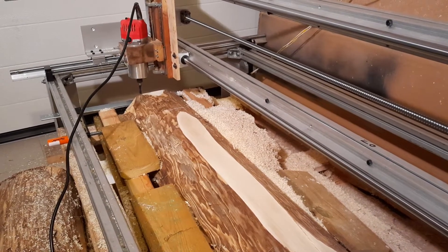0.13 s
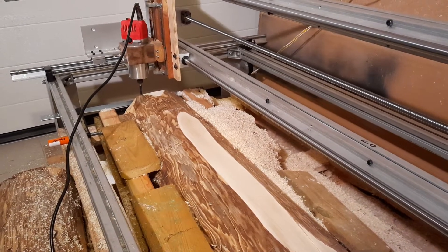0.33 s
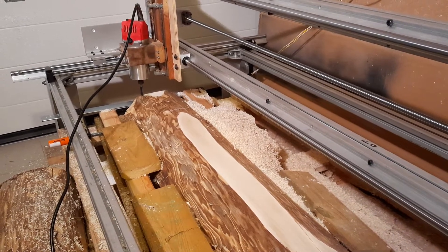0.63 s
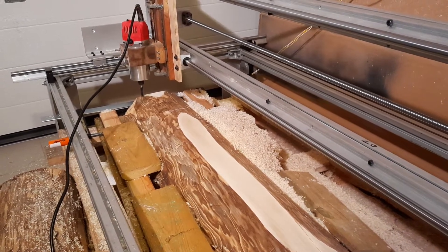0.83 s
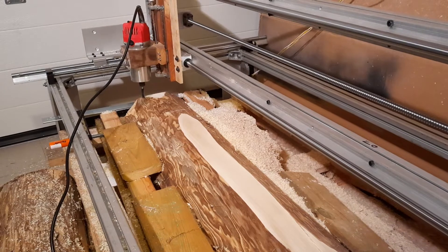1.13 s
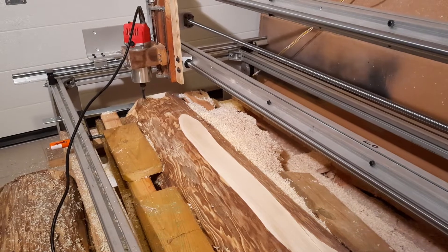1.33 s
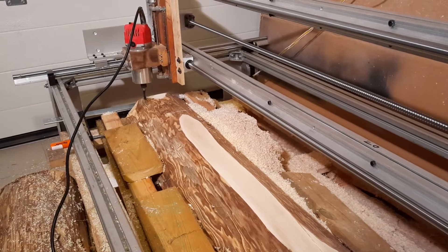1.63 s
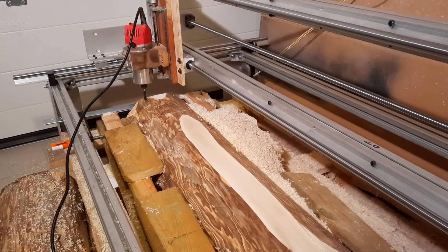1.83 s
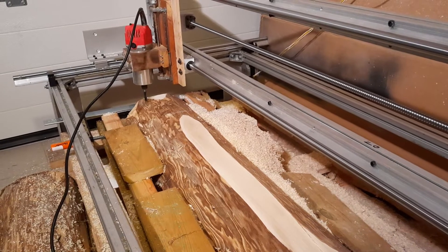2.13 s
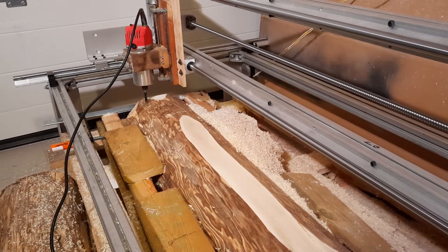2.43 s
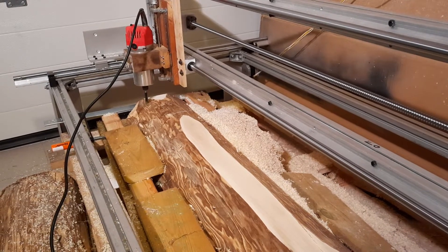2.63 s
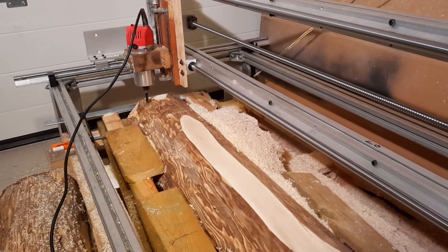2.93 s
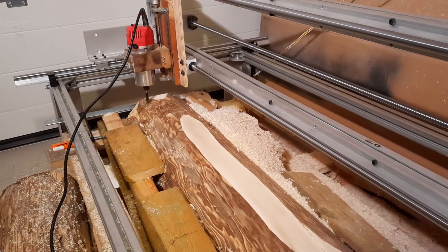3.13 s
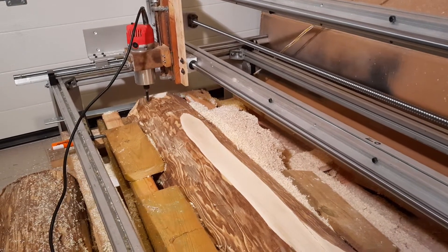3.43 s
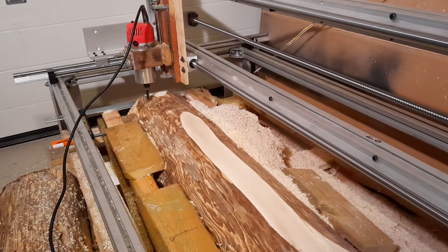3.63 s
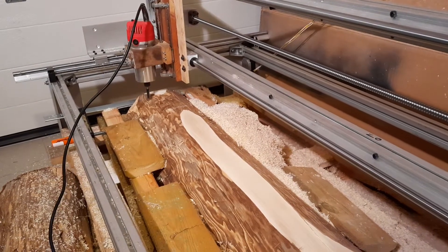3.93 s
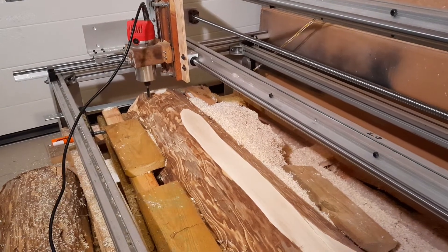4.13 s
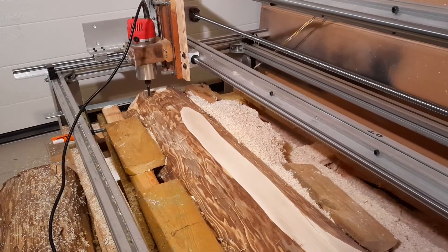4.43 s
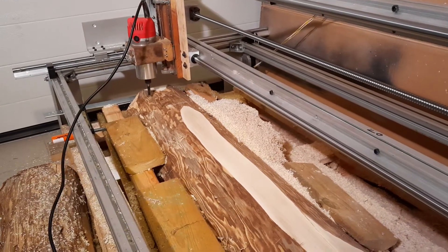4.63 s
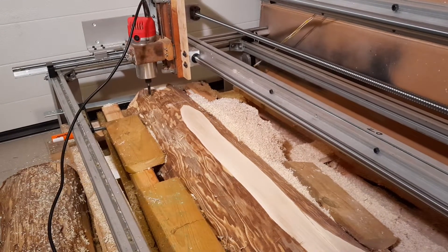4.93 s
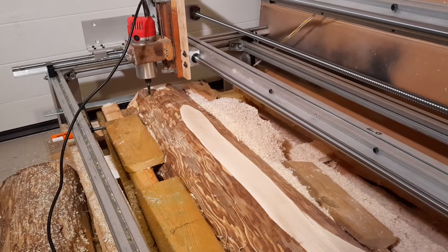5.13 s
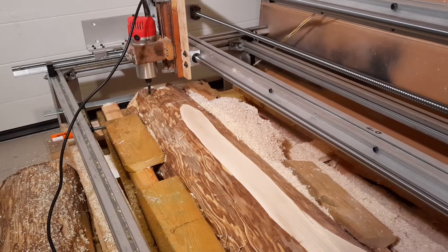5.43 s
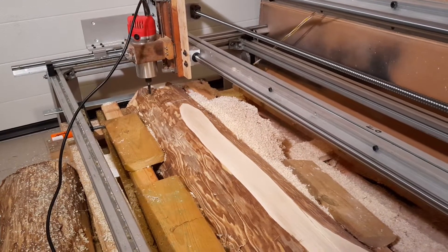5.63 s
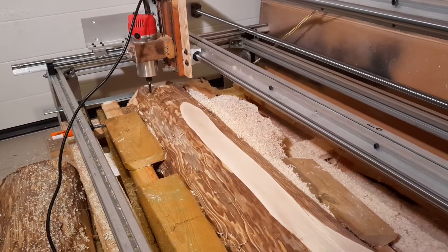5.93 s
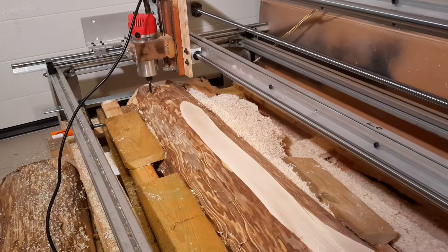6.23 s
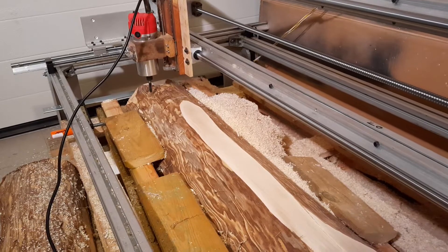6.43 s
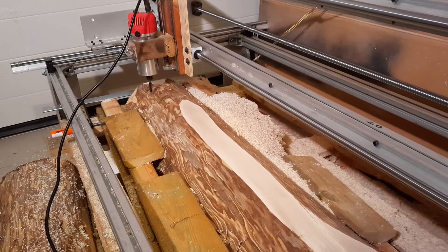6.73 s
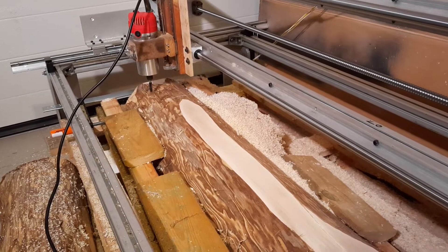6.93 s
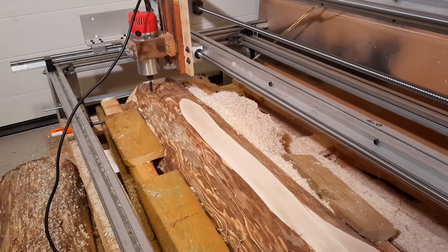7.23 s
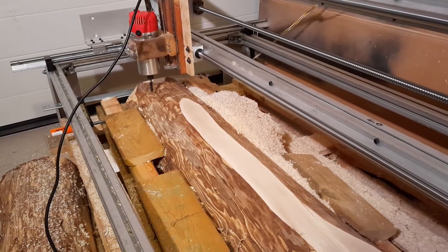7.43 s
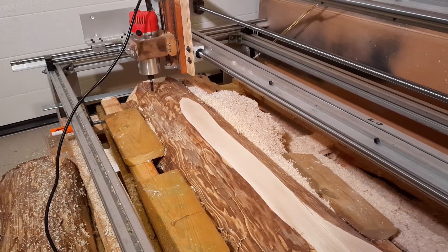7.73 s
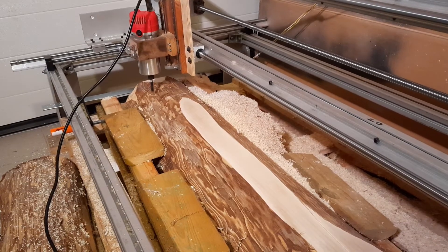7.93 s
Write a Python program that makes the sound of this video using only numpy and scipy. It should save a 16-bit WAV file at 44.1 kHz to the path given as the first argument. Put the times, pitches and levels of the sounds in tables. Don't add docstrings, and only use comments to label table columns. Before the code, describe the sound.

In a garage workshop, a router mills a log without pause. Its steady, nasal whine sits near 500 hertz, with higher overtones swelling and fading separately left and right. Rushing chips, high cooling-air hiss and a low bench rumble fill the background. Brief harder bites interrupt the smooth tone, strongest near the end. A phone at close range moves slowly, its left side duller.

```python
import sys
import numpy as np
from scipy import signal
from scipy.fft import rfft, irfft, next_fast_len
from scipy.io import wavfile

SR = 44100
rng = np.random.default_rng(int(sys.argv[2]) if len(sys.argv) > 2 else 0)


def amplitude_ratio(level_db):
    exponent = np.asarray(level_db, float) / 20
    return 10 ** exponent


def materialize(psi):
    bounded = np.clip(np.atleast_2d(psi).T, -1, 1)
    quanta = np.round(bounded * 32767).astype(np.int16)
    wavfile.write(sys.argv[1], SR, quanta)


N = 357210
T = np.arange(N) / SR
HOLD = 50


def in_time(rows):
    seconds, *columns = np.transpose(rows)
    return [np.interp(T, seconds, column) for column in columns]


def at_hz(points, hz):
    point_hz, db = np.transpose(points)
    return np.interp(np.log(hz), np.log(point_hz), db)


def drift(rate, count):
    pole = np.exp(-2 * np.pi * rate * HOLD / SR)
    warm_up = 3000
    white = rng.standard_normal((count, N // HOLD + 1 + warm_up, 2)) @ [1, 1j]
    slow = signal.lfilter([1], [1, -2 * pole, pole * pole], white)[:, warm_up:]
    spread = np.sqrt(np.mean(abs(slow) ** 2, axis=1, keepdims=True))
    return (slow / spread).astype(np.complex64)


def held(slow):
    return np.repeat(slow, HOLD, axis=1)[:, :N]


def swell(s, length, left_db, right_db):
    start = max(int((s - 0.8 * length) * SR), 0)
    near = slice(start, int((s + 0.8 * length) * SR))
    shape = np.exp(-(1.98 * (T[near] - s) / length) ** 4)
    return near, amplitude_ratio(np.array([[left_db], [right_db]])) * shape


# time in seconds, turns per second.
SPINDLE_SPEED = [(0, 499.5), (0.2, 499.4), (0.45, 498.3), (0.6, 498.8), (1.2, 502.3), (1.5, 502.7),
                 (2.3, 503.1), (2.6, 502.9), (3.5, 504.0), (4, 503.4), (4.8, 504.0), (6, 504.2),
                 (6.7, 505.1), (7.3, 504.6), (7.6, 504.2), (7.85, 503.2), (8.1, 502.9)]


def spindle_turn():
    return 2 * np.pi * np.cumsum(in_time(SPINDLE_SPEED)[0]) / SR


WHINE_PHASE = [1, 3.3, -0.3, -1.45, 3.7, 2.0]
# multiple, level in dB against the level in BITES, phase against
BITE_VOICE = [(1, -5, 3.95), (2, -30, 0.67), (3, 3, 1.64), (4, -34, 1.3), (5, -27, 1.2), (6, -21, 1.3)]
# time in seconds, shift in radians.
PATH_SHIFT = [(0.7, 0), (1.1, 0.6), (1.65, 1.25), (2.0, 1.7), (3.4, 2.05), (5.5, 2.15)]
# time in seconds, shift in radians.
FLUTE_FLIP = [(2.75, 0), (3.15, -4.1)]


def whine(turn, flutter):
    out, bites = 0, bite_swell()
    shifts = {1: PATH_SHIFT, 2: FLUTE_FLIP}
    for multiple, (_, bite_db, bite_rad) in enumerate(BITE_VOICE, 1):
        height, left_lead = standing_wave(multiple)
        shake = 1.1 * drift(9.0, count=2) + 0.5 * drift(22, count=1)
        height = height * held(1 + flutter[multiple - 1] * shake)
        height = height + amplitude_ratio(bite_db) * np.exp(1j * bite_rad) * bites
        height = height * brief_change(multiple)
        lead = [[1], [0]] * left_lead
        if multiple in shifts:
            lead = lead + in_time(shifts[multiple])[0]
        phase = multiple * turn + WHINE_PHASE[multiple - 1] + lead
        phase = (phase % (2 * np.pi)).astype(np.float32)
        out = out + height.real * np.cos(phase) - height.imag * np.sin(phase)
    return np.sqrt(2) * out


# time in seconds,
# left level in dB, right level in dB, lead of the left port in radians.
UNBALANCE = [(0.0, -14.5, -19, -0.52), (0.5, -13.5, -16.5, -0.87), (0.85, -16, -20, -0.85),
             (1.05, -18, -22, -1.3), (1.2, -21.5, -24, -1.2), (1.7, -26.5, -25, -2), (2.16, -31, -21, -1.4),
             (2.6, -27, -21, -1.1), (3.0, -29.5, -20, -0.6), (3.5, -23.5, -18, -0.36),
             (4.32, -25.5, -18.5, -0.087), (4.86, -20.5, -17.5, 0.37), (5.4, -21.5, -17, -0.15),
             (5.94, -20, -17.5, -0.35), (6.7, -16, -15.5, -0.32), (7.3, -17, -16.5, -0.36),
             (7.6, -19.5, -17.5, -0.26), (8.1, -21, -19, -0.46)]
# multiple, left level in dB, right level in dB.
WHINE_REST = [(2, -30, -35.5), (3, -44, -29.5), (4, -34.5, -32.5), (5, -41, -46), (6, -43.5, -57)]
# middle in
# seconds, length in # seconds, multiple, left level in dB, right level in dB.
WHINE_LIFTS = [(0.15, 1.7, 2, -70.5, -32.5), (0.36, 0.13, 2, -32, -70.5), (1.38, 1.45, 2, -30.0, -42),
               (2.422, 1, 2, -28, -45), (2.55, 0.27, 2, -33, -68.5), (3.18, 0.34, 2, -30, -70.5),
               (3.74, 0.32, 2, -38, -36), (4.04, 0.15, 2, -38, -35), (4.3, 2.84, 2, -29.5, -46),
               (4.328, 0.2, 2, -33, -31.0), (4.52, 0.74, 2, -36, -34), (4.72, 0.12, 2, -32, -32),
               (4.96, 0.25, 2, -70.5, -35.5), (5.274, 0.32, 2, -33, -24.5), (5.86, 0.2, 2, -37, -36),
               (6.32, 0.39, 2, -37, -42), (6.812, 0.15, 2, -31, -30), (7.3, 4.1, 2, -70.5, -29),
               (7.522, 0.11, 2, -35.5, -36), (7.85, 0.65, 2, -32.5, -70.5), (-0.2, 1.1, 3, -34, -31.5),
               (0.103, 0.19, 3, -29, -70.5), (0.96, 0.11, 3, -40, -39.5), (1.18, 1.1, 3, -29, -57.5),
               (1.74, 1, 3, -36.0, -72), (2.55, 1.35, 3, -30, -70.5), (2.78, 0.35, 3, -39.0, -40.5),
               (2.8, 3.4, 3, -30, -35), (3.17, 0.28, 3, -55, -32), (3.62, 0.12, 3, -29.5, -57.5),
               (4.22, 0.12, 3, -26, -47), (4.36, 0.13, 3, -29, -29), (4.58, 0.13, 3, -32, -41.5),
               (5.05, 1.6, 3, -49, -33.5), (5.22, 0.19, 3, -27.5, -29), (6.05, 1, 3, -67.5, -40),
               (6.92, 0.26, 3, -29, -53), (7.3, 0.17, 3, -54.0, -32), (7.6, 0.12, 3, -31, -41),
               (0.15, 1.4, 4, -70.5, -32), (2.07, 1.64, 4, -33.5, -70.5), (2.29, 0.41, 4, -70.5, -31.5),
             (2.643, 0.34, 4, -31, -33), (0.45, 0.07, 4, -37, -36), (6.17, 0.12, 6, -42, -35),
             (2.95, 2.8, 4, -41, -40), (3.21, 0.33, 4, -32, -33.5), (3.56, 0.39, 4, -56.0, -30),
             (4.35, 1.2, 4, -65, -27.5), (5.07, 0.17, 4, -68, -33), (5.334, 0.16, 4, -30, -70.5),
             (6.3, 3.4, 4, -33, -29), (7.06, 0.43, 4, -48.0, -36), (7.85, 1.1, 4, -28, -30.5),
             (0.15, 0.59, 5, -42, -50), (1.18, 0.89, 5, -52.0, -38.5), (2.052, 0.97, 5, -33.5, -70.5),
             (3.3, 0.63, 5, -39, -43), (4.05, 0.94, 5, -33, -41), (4.7, 0.45, 5, -42, -70.5),
             (4.8, 4.3, 5, -54, -36.5), (5.36, 0.34, 5, -37.0, -40.5), (5.8, 0.35, 5, -44, -41),
             (6.58, 0.4, 5, -35.0, -49), (6.94, 0.17, 5, -44.0, -43), (7.53, 0.07, 5, -30, -70.5),
             (7.67, 1.2, 5, -37.5, -49.0), (-0.02, 0.38, 6, -46.5, -36), (0.85, 2.6, 6, -40.5, -38),
             (1.42, 0.62, 6, -45, -31), (2.07, 0.63, 6, -70.5, -33), (2.58, 0.21, 6, -33, -39.0),
             (3.675, 0.69, 6, -41, -28), (3.8, 3.7, 6, -54, -32), (4.05, 0.24, 6, -43, -40),
             (4.55, 0.91, 6, -69, -41), (5.05, 1.5, 6, -39, -33.5), (5.86, 0.22, 6, -70.5, -31),
             (5.92, 1.32, 6, -30, -60.5), (7.18, 0.89, 6, -42, -53)]


def standing_wave(multiple):
    if multiple == 1:
        left_db, right_db, lead = in_time(UNBALANCE)
        return amplitude_ratio(np.array([left_db, right_db])), lead
    rest_db = np.array(WHINE_REST[multiple - 2][1:])
    height = amplitude_ratio(rest_db)[:, None] * np.ones(N)
    for s, length, k, left_db, right_db in WHINE_LIFTS:
        if round(k) == multiple:
            near, lift = swell(s, length, left_db, right_db)
            height[:, near] += lift
    return height, port_lead(multiple)


FIRST_LEAD = [-1.04, 1.13, 3.08, 1.48, 0.04, -1.86, -1.47, 0.3, 2.53]
# time in seconds, multiple, turn of the lead in
NODE_SLIPS = [(1.0, 2, -0.61), (2.95, 2, 2.68), (3.5, 2, 0.57), (3.95, 2, -1.03), (4.15, 2, 0.66),
              (4.75, 2, 0.2), (5.25, 2, 0.06), (6.1, 2, 0.47), (6.9, 2, -0.43), (7.5, 2, -0.75),
              (0.7, 3, 1.15), (0.9, 3, 0.59), (1.6, 3, 0.56), (3.1, 3, 0.47), (3.9, 3, -0.37),
              (5.3, 3, -0.79), (5.65, 3, 3.17), (6.5, 3, -3.71), (6.8, 3, 0.55), (7.25, 3, -0.91),
              (0.9, 4, -3.83), (1.4, 4, -1.43), (1.8, 4, 1.88), (2.1, 4, -0.91), (2.55, 4, 0.35),
              (4.05, 4, -0.46), (5.05, 4, 1.35), (5.7, 4, -0.84), (6.25, 4, -1.3), (6.85, 4, 0.53),
              (0.2, 5, -3.39), (0.9, 5, 2.98), (2.5, 5, -0.95), (3.9, 5, 0.28), (4.7, 5, -0.68),
              (5.15, 5, -1.93), (5.45, 5, 0.66), (6.05, 5, -2.33), (6.95, 5, 1.56), (7.5, 5, 2.81),
              (1.0, 6, 3.65), (1.6, 6, 1.02), (2.45, 6, -0.57), (2.95, 6, -1.01), (3.95, 6, -0.91),
              (4.25, 6, -0.86), (5.05, 6, 0.61), (5.35, 6, 0.33), (6.0, 6, 1.05), (6.5, 6, -4.87),
              (0.2, 7, -0.66), (0.9, 7, -3.34), (1.55, 7, -0.64), (3.55, 7, 2.67), (4.6, 7, -0.98),
              (4.8, 7, -0.61), (5.8, 7, 1.23), (7.25, 7, -5.81), (7.7, 7, 1.0), (1.4, 8, 10.57),
              (1.8, 8, 3.52), (3.05, 8, -3.58), (3.6, 8, -3.44), (3.95, 8, -3.61), (4.95, 8, -1.47),
              (5.7, 8, -1.6), (6.4, 8, 2.35), (6.8, 8, 0.6), (1.0, 9, 1.51), (2.0, 9, -2.52),
              (2.3, 9, 1.67), (2.8, 9, -4.33), (3.15, 9, -1.48), (3.35, 9, -1.83), (4.75, 9, -3.18),
              (6.7, 9, -2.45), (7.35, 9, 3.14), (0.95, 10, -1.7), (2.1, 10, -1.27), (3.15, 10, 2.48),
              (4.7, 10, -1.85), (5.8, 10, -1.74), (6.2, 10, -1.87), (7.9, 10, -1.28)]


def port_lead(multiple):
    lead = FIRST_LEAD[multiple - 2]
    for s, k, rad in NODE_SLIPS:
        if round(k) == multiple:
            lead = lead + np.interp(T, [s - 0.2, s + 0.2], [0, rad])
    return lead


# middle in seconds, length in seconds, left and right level in dB, to
BITES = [
    (0.483, 0.098, -23, -25),
    (0.996, 0.077, -38, -32),
    (2.59, 0.18, -23, -32),
    (4.737, 0.11, -27, -23),
    (5.378, 0.12, -26, -18),
    (6.822, 0.11, -22, -24),
    (7.116, 0.15, -28, -36),
    (7.549, 0.12, -17, -19),
    (8.105, 0.14, -14, -21),
]


def bite_swell():
    out = np.zeros((2, N))
    for s, length, left_db, right_db in BITES:
        near, height = swell(s, length, left_db, right_db)
        build_db = 2.0 * np.clip((T[near] - s) / length, -1, 0.5)
        out[:, near] += height * amplitude_ratio(build_db)
    return out


# middle in seconds, length in seconds, # multiple, left
# change in dB, right change in dB.
BRIEF_CHANGES = [(2.04, 0.086, 1, -5, -4), (2.6, .12, 1, -4, 0), (5.48, 0.11, 1, 3, 1), (7.55, .07, 1, -3, 0),
                 (8.09, .08, 1, -5, -0.5), (0.52, 0.077, 2, -10, 2), (5.46, .05, 2, -1, -9),
                 (6.67, 0.16, 2, -4, -5), (1.06, .05, 3, -12, 4), (2.7, .04, 3, -6, 1), (0.5, 0.19, 3, 0, -5)]


def brief_change(multiple):
    db = np.zeros((2, N))
    for s, length, k, left_db, right_db in BRIEF_CHANGES:
        if round(k) == multiple:
            near, shape = swell(s, length, 0, 0)
            db[:, near] += shape * [[left_db], [right_db]]
    return amplitude_ratio(db)


# middle in seconds,
# length in seconds, multiple, left level in dB, right level in dB.
HIGH_LIFTS = [(0.3, 1.2, 7, -40, -35), (1.46, 0.8, 7, -41, -43.0), (1.805, 0.15, 7, -46.0, -35),
              (2.86, 1, 7, -37.5, -70.5), (3.3, 3.6, 7, -39.5, -46), (4.28, 0.17, 7, -45, -45.0),
              (4.75, 0.17, 7, -36, -43.5), (5.3, 1, 7, -47, -60), (7.53, 0.17, 7, -46, -43),
              (7.8, 4, 7, -45, -40.5), (7.85, 0.7, 7, -37.5, -51.5), (0.32, 0.62, 8, -40, -47.0),
              (1.3, 3.4, 8, -50, -44), (2.32, 0.25, 8, -52, -47), (2.915, 1.25, 8, -56, -34.5),
              (4.18, 2.4, 8, -47, -70.5), (4.36, 0.31, 8, -47, -40), (4.985, 0.29, 8, -43, -35.5),
              (5.8, 4.4, 8, -43, -38.5), (6.24, 0.4, 8, -70.5, -51), (6.92, 1.04, 8, -70.5, -33.5),
              (7.86, 0.37, 8, -46.0, -38), (0.152, 1.4, 9, -47, -41), (1.55, 0.97, 9, -42, -40),
              (2.55, 1.2, 9, -39.0, -70.5), (3.292, 4.3, 9, -48.5, -40), (3.742, 1, 9, -44.5, -44),
              (5.31, 0.65, 9, -40, -70.5), (5.8, 0.5, 9, -45, -45), (6.1, 0.31, 9, -52.0, -46),
              (6.9, 0.25, 9, -70.5, -39), (6.8, 2.8, 9, -56.0, -46.0), (7.8, 0.5, 9, -39.0, -45),
              (0.52, 0.25, 10, -70, -40.0), (1.8, 4, 10, -48, -45.5), (2.08, 0.32, 10, -70.5, -41),
              (3.8, 1, 10, -44, -64), (5.8, 3.2, 10, -53, -38.5), (6.68, 0.5, 10, -70.5, -43),
              (7.92, 0.81, 10, -50.0, -35),
              (5.74, 2.5, 11, -52, -43), (7.81, 0.47, 11, -58, -35), (-0.2, 0.93, 12, -52, -31.5),
             (1.28, 1.6, 12, -57, -32), (2.69, 0.72, 12, -60, -29), (3.5, 0.62, 12, -60, -37),
             (4.5, 0.8, 12, -60, -34.5), (5.4, 1.8, 12, -57, -34), (7.4, 2.2, 12, -49, -41),
             (8.06, .12, 12, -50, -36), (4.03, 1.2, 13, -60, -36.5), (4.99, 0.35, 13, -58, -32.5),
             (6.41, 0.88, 13, -52, -35), (7.94, 1.3, 13, -60, -41), (3.04, 0.74, 15, -70, -38),
             (5.18, 0.85, 15, -70, -42), (7.36, 0.65, 15, -70, -34.5), (3.1, 1.36, 16, -70, -42),
             (7.47, 0.64, 16, -70, -39)]
# middle in seconds, length in seconds, left level in dB, right level in dB.
BALL_WHISTLE = (3.8, 2.0, -46, -34)
# middle in seconds, length in seconds,
# left level in dB, right level in dB.
SIXTH_RING = (7.6, .055, -28, -28)


def lifted_tones(turn, flutter):
    out = np.zeros((2, N))
    shake = held(1 + flutter * drift(9.1, count=2).real)
    rows = [(round(k), s, length, *levels) for s, length, k, *levels in HIGH_LIFTS]
    rows += [(10.789, *BALL_WHISTLE), (6, *SIXTH_RING)]
    leads = {k: port_lead(k) for k in range(7, 11)}
    for k, s, length, left_db, right_db in rows:
        near, height = swell(s, length * 1.1, left_db, right_db)
        left_lead = leads[k][near] if k in leads else np.ones(1)
        out[:, near] += height * np.cos(k * turn[near] + k * k + [[1], [0]] * left_lead)
    return np.sqrt(2) * out * shake


def fading_tones(multiples, levels_db, turn, steady, rate):
    out = 0
    blocks = np.resize(turn, (N // HOLD + 1, HOLD))
    for k, level_db in zip(multiples, levels_db):
        port = amplitude_ratio(level_db + np.array([[left_port_db(503 * k)], [0]]))
        height = port * (steady + np.sqrt(1 - steady ** 2) * drift(rate, count=2))
        height = height.astype(np.complex64)[:, :, None]
        phase = (k * blocks % (2 * np.pi)).astype(np.float32)
        out = out + height.real * np.cos(phase) - height.imag * np.sin(phase)
    return np.sqrt(2) * out.reshape(2, -1)[:, :N]


UPPER_DB = [-44, -52, -47, -48, -45.5, -47.5, -42, -46, -44.5, -45.5, -55]


def upper_whine(turn):
    return fading_tones(range(7, 18), UPPER_DB, turn, steady=0.1, rate=4.0)


FAINT_MULTIPLES = [.133, 1.133, .398, .602, .801, .867, .941, 1.199, 1.398, 1.941, 2.133, 3.398, 3.598,
                   3.801, 4.402, 5.398, 8.398, 10.789, 14.387, 23, 24, 25, 26]
FAINT_DB = [-66, -54.5, -64.5, -55.5, -59.5, -51, -45.5, -55, -51.5, -48.5, -47.5, -47, -47.5, -57, -56,
            -52, -46, -50, -61, -54, -54, -54, -56]


def bearing_tones(turn):
    return fading_tones(FAINT_MULTIPLES, FAINT_DB, turn, steady=0.84, rate=1.2)


# middle in seconds, length in seconds, level in dB.
FEED_PUSHES = [
    (6.18, 0.31, -57.5),
    (7.25, 0.85, -61.5),
    (8.1, .3, -54),
]


def feed_hum():
    height = np.full((2, N), amplitude_ratio(-69))
    for s, length, level_db in FEED_PUSHES:
        near, push = swell(s, length, level_db, level_db)
        height[:, near] += push
    return np.sqrt(2) * height * np.cos(2 * np.pi * 88.5 * T)


# frequency in Hz, level in dB per Hz.
CHIP_SPECTRUM = [(300, -130), (500, -91), (650, -73.5), (825, -63.5), (885, -64), (925, -60), (970, -59.5),
                 (1030, -56.5), (1150, -63.5), (1550, -66.5), (1800, -65), (2400, -64), (3500, -64.5),
                 (5500, -80.5), (8000, -120)]


def chip_rush(turn, rush_db):
    each_turn = 1 + 0.14 * np.cos(turn)
    follow = 0.91
    return amplitude_ratio(follow * rush_db) * each_turn * noise(CHIP_SPECTRUM, patchy_db=1.0, rate=8.0, echo_db=-16.5)


# frequency in Hz, level in dB per Hz.
AIR_SPECTRUM = [(1200, -130), (2000, -85), (3500, -66.5), (5000, -63.5), (6800, -60.5), (8000, -62.5),
                (8900, -71), (9700, -77), (11500, -73.5), (12700, -68.5), (14000, -70), (16500, -73)]


def cooling_air(rush_db):
    return amplitude_ratio(rush_db) * noise(AIR_SPECTRUM, patchy_db=0.73, rate=4.0, echo_db=-24.5)


# time in seconds, level in dB.
RUSH_NEARNESS = [(0, -0.5), (1.0, 0), (1.8, .5), (3.0, 1.5), (4.5, 0.5), (5.4, 0.5), (6.4, -.5), (8.1, 0.5)]


def rush_nearness():
    return in_time(RUSH_NEARNESS)[0]


# frequency in Hz, level in dB per Hz.
RUMBLE_SPECTRUM = [(20, -94), (45, -93), (68, -76.5), (110, -81.5), (140, -74.5), (240, -78.5),
                   (320, -71.5), (500, -68), (640, -70.5), (900, -99), (1200, -130)]


def rumble():
    return noise(RUMBLE_SPECTRUM, patchy_db=-1.5, rate=2.3, echo_db=-22.0)


# frequency in Hz, correlation from -1 to 1.
LIKENESS = [(60, 0.88), (290, 0.96), (640, 0.77), (1000, 0.43), (1410, -0.014), (3100, 0.019)]


def noise(spectrum, patchy_db, rate, echo_db):
    size = next_fast_len(N)
    hz = np.arange(1, size // 2 + 2) * SR / size
    mid, side = rfft(rng.standard_normal((2, size)))
    alike = np.clip(at_hz(LIKENESS, hz), -1, 1)
    pair = np.sqrt(1 + alike) * mid + np.sqrt(1 - alike) * side * [[1], [-1]]
    pair = pair * np.sqrt(SR) / 2
    colour_db = at_hz(spectrum, hz) + [[1], [0]] * left_port_db(hz)
    pair = pair * amplitude_ratio(colour_db) * abs(wall_echoes(hz, echo_db))
    flicker = held(amplitude_ratio(patchy_db * drift(rate, count=1).real))
    return irfft(pair, size)[:, :N] * flicker


def wall_echoes(hz, echo_db):
    lags = rng.uniform(0.004, 0.035, (6, 2, 1))
    return 1 + amplitude_ratio(echo_db) * np.exp(-2j * np.pi * hz * lags).sum(axis=0)


# frequency in Hz, level in dB against the right.
LEFT_PORT = [(200, -1.6), (700, 4), (850, 3.5), (1100, -3), (1400, 8), (2000, 0.5), (4000, -2.5),
             (5000, -7.5), (6000, -13), (7500, -72), (8500, -73), (9700, -61), (12000, -4.5),
             (14500, -16.5), (15600, -22)]


def left_port_db(hz):
    return at_hz(LEFT_PORT, hz)


def scene():
    turn = spindle_turn()
    rush_db = rush_nearness()
    tones = whine(turn, flutter=[0.02, 0.18, 0.11, 0.11, 0.32, 0.17])
    tones = tones + lifted_tones(turn, flutter=0.19)
    tones = tones + upper_whine(turn) + bearing_tones(turn) + feed_hum()
    return tones + chip_rush(turn, rush_db) + cooling_air(rush_db) + rumble()


def roll_off(x):
    return signal.sosfilt(signal.butter(12, 15830, fs=SR, output="sos"), x)


def record(dry):
    return roll_off(dry)


dry = scene()
out = record(dry)
materialize(out)
```